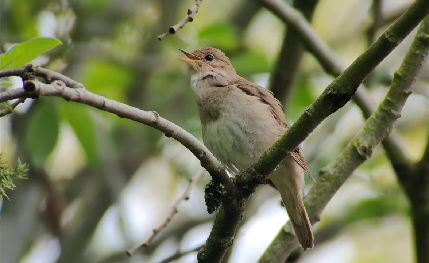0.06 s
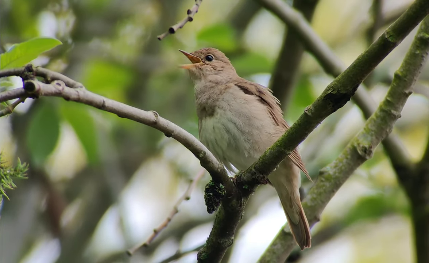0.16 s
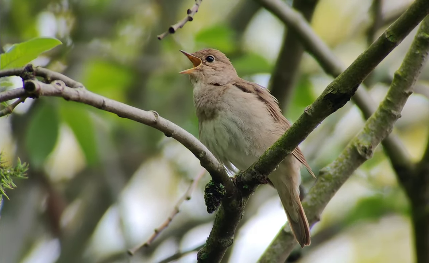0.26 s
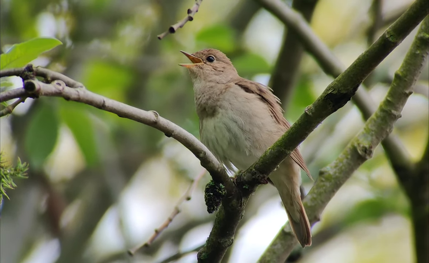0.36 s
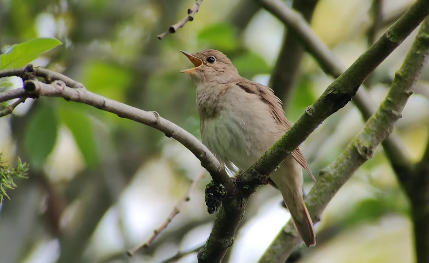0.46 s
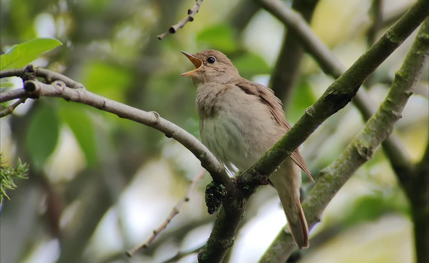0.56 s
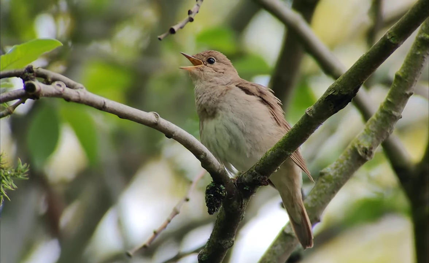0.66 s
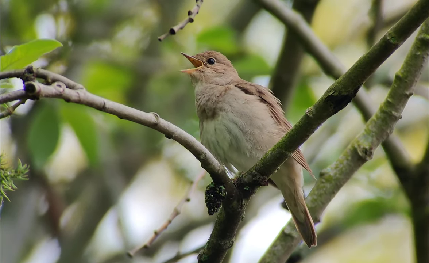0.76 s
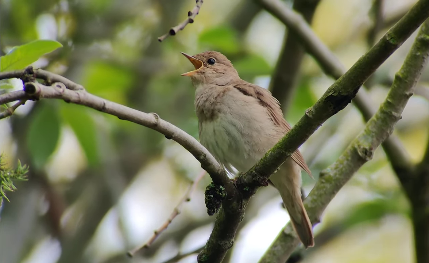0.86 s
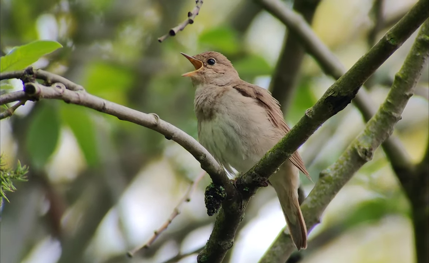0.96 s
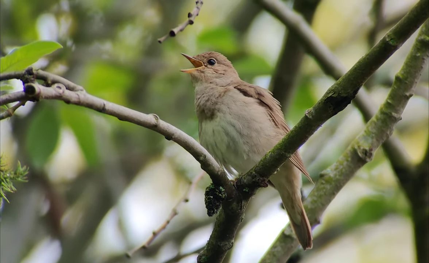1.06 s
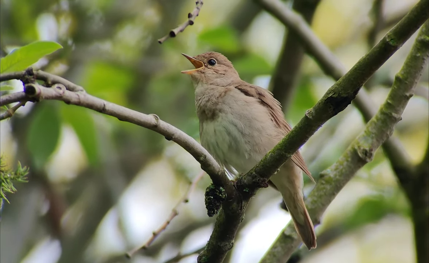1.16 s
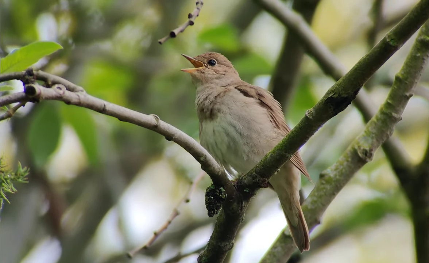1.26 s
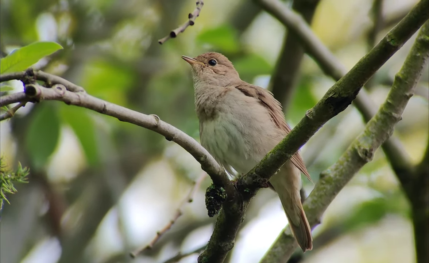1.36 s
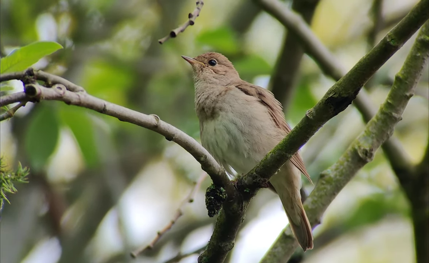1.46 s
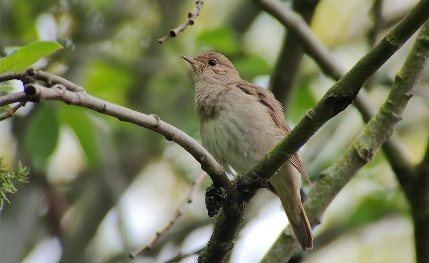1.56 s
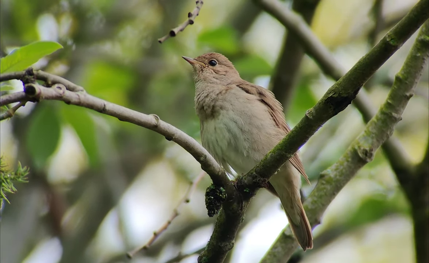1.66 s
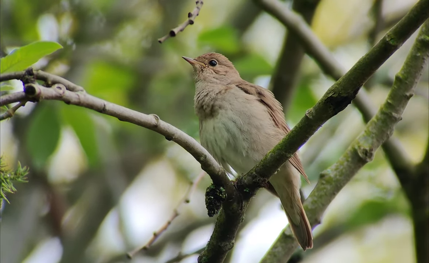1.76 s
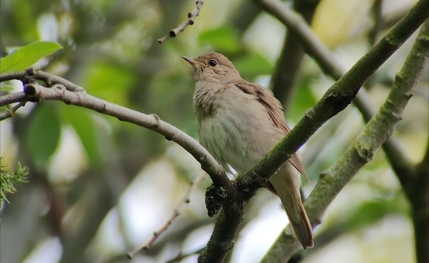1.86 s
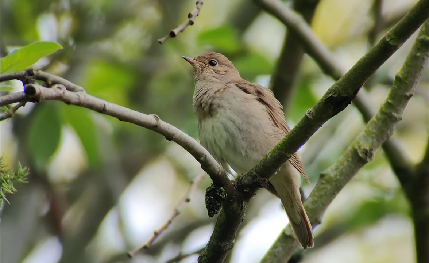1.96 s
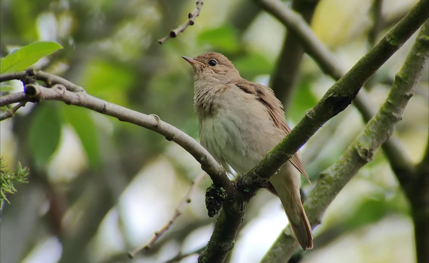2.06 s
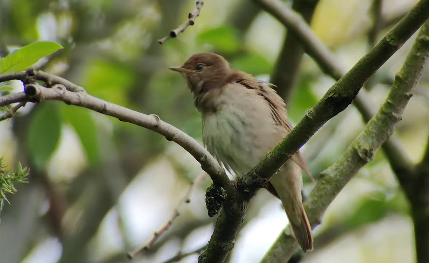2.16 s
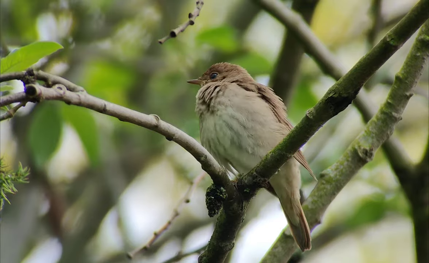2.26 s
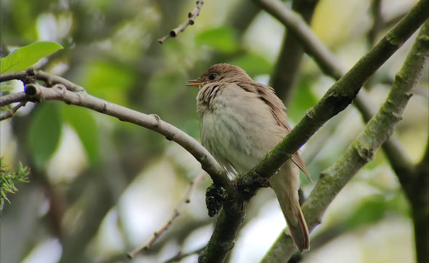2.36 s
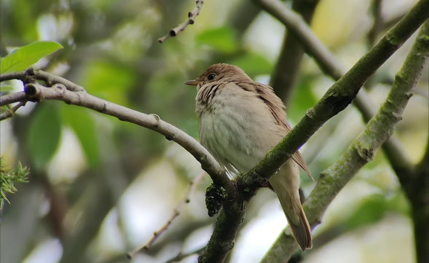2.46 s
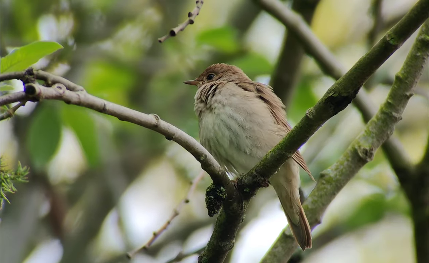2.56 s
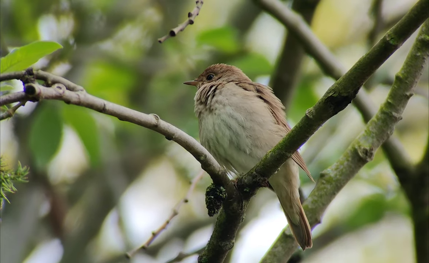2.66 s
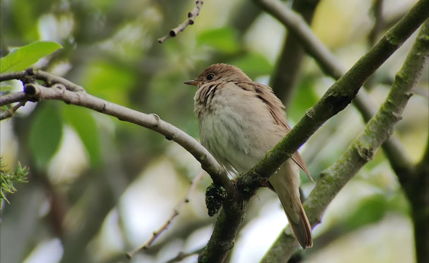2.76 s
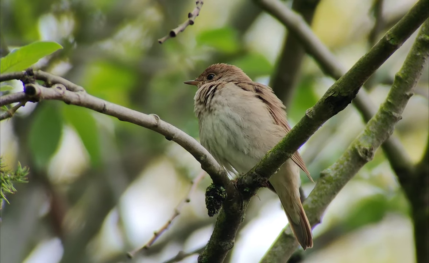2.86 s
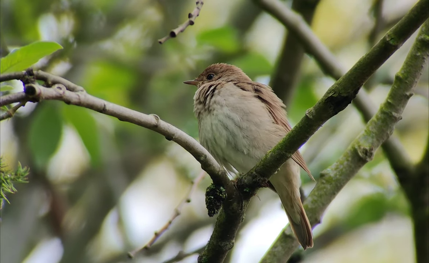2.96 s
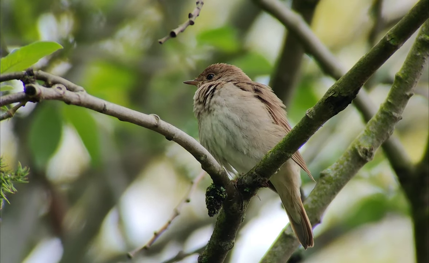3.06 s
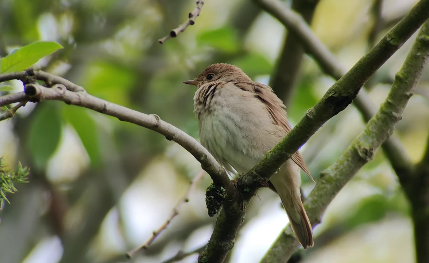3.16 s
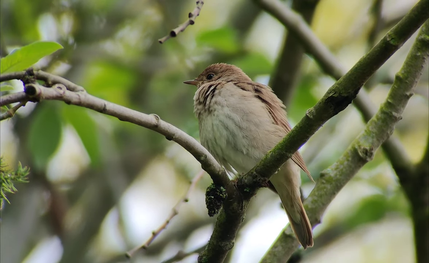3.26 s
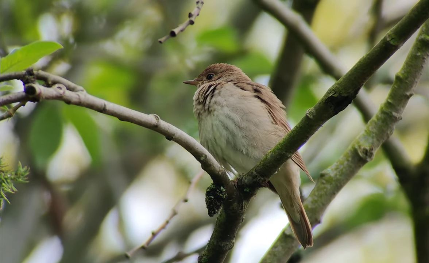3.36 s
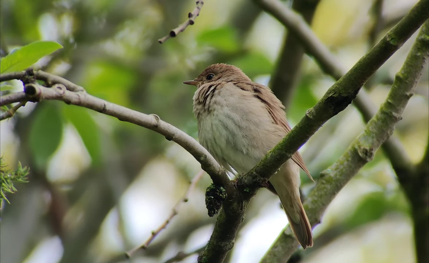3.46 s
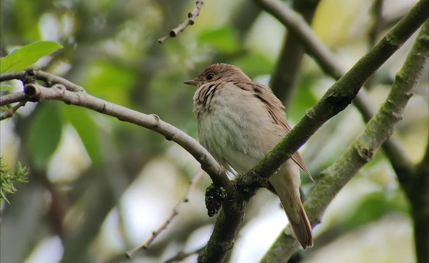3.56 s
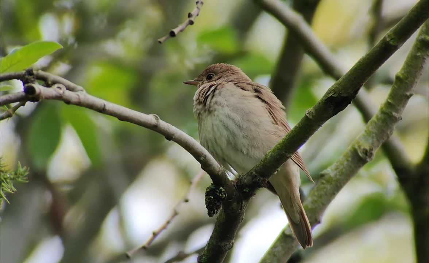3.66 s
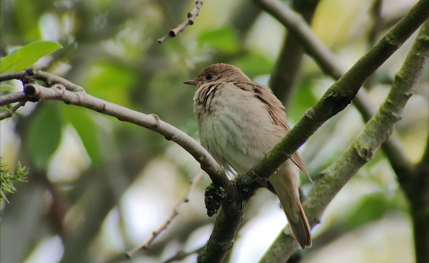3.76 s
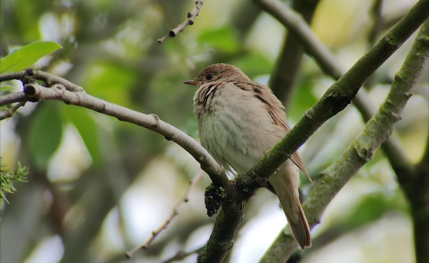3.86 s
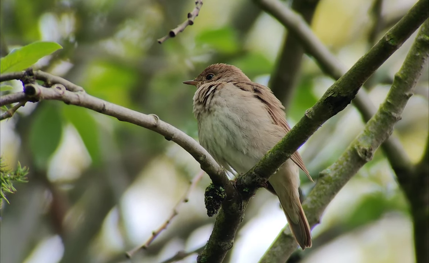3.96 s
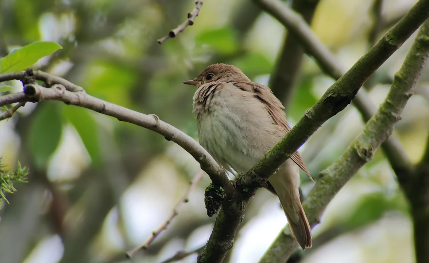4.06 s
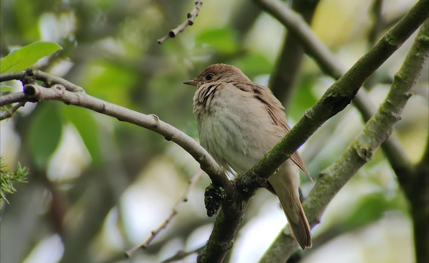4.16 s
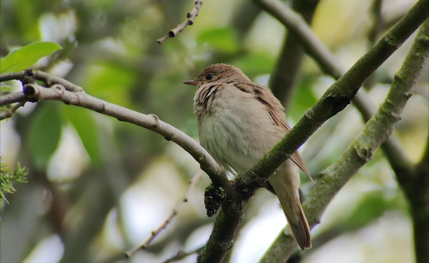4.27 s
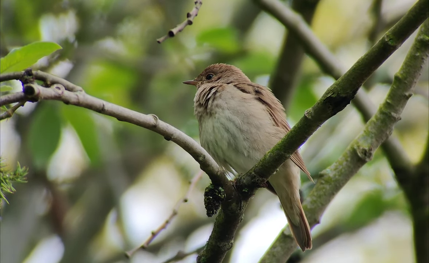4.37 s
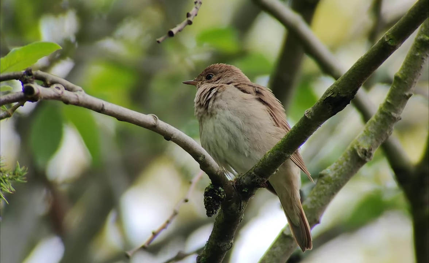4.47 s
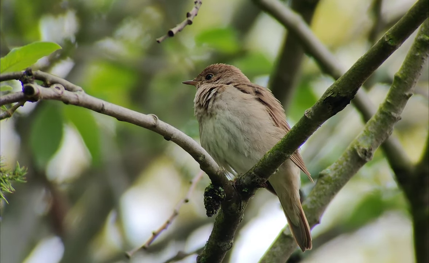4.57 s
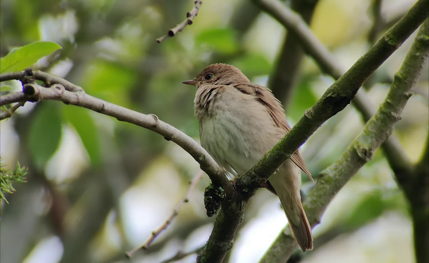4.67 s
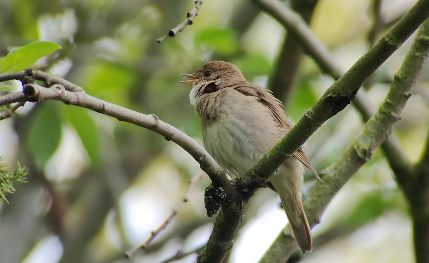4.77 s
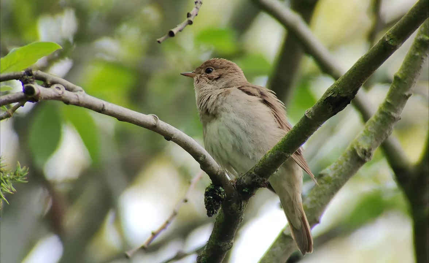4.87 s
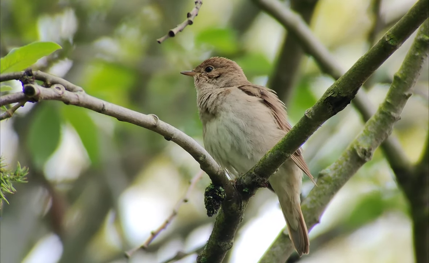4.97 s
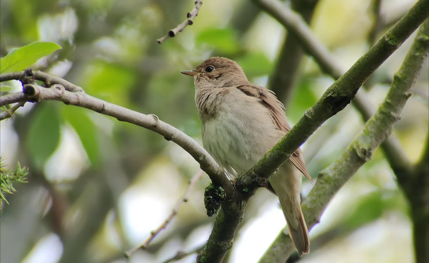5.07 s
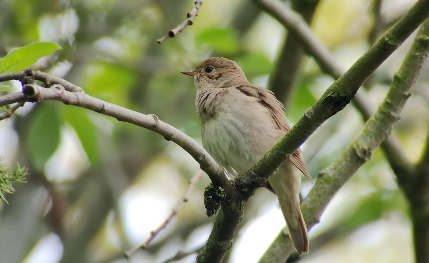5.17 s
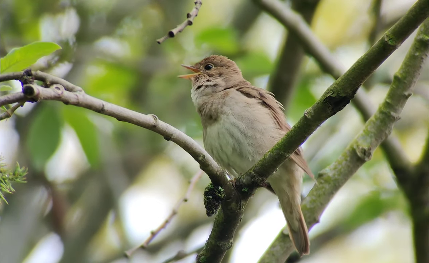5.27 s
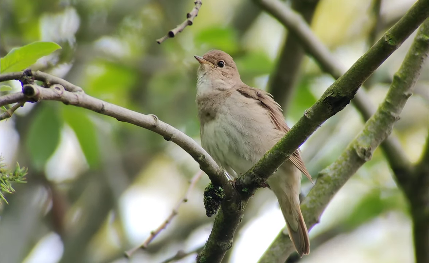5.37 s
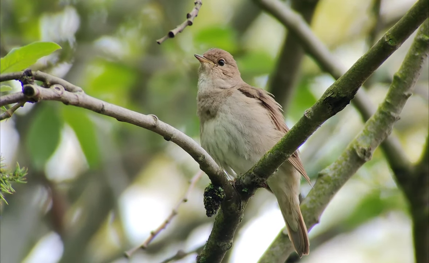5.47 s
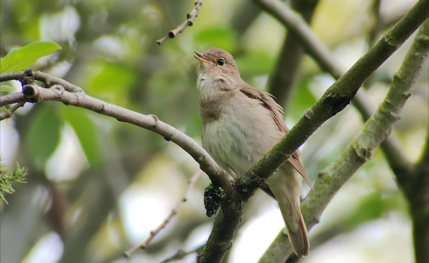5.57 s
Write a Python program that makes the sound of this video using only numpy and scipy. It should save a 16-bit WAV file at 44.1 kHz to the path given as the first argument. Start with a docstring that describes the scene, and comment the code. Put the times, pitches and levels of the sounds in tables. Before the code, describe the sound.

A thrush nightingale gives quick slurred whistles and a dry clicking rattle, then pauses, while distant gulls screech over low traffic rumble.

```python
"""A thrush nightingale sings from a branch in a leafy thicket: gliding tones make its slurred whistles and
a thin high flick, noise puffs a dry rattle of double clicks; after a pause come two soft opening notes.
Leaves and trunks scatter the song, made as fading noise echoes. Farther off, gulls screech in throbbing
harmonics and small birds pipe in plain tones, over filtered noise for traffic and distant machinery
and two low tones for an idling engine."""
import sys
import numpy as np
from scipy import signal
from scipy.fft import rfft, irfft
from scipy.io import wavfile
from scipy.ndimage import map_coordinates

SR = 44100
rng = np.random.default_rng(int(sys.argv[2]) if len(sys.argv) > 2 else 0)


def unload_wav(signal):
    """Save mono or channel-first audio to the path in sys.argv[1] as 16-bit WAV at rate SR, clipped to [-1, 1]."""
    wavfile.write(
        sys.argv[1],
        SR,
        np.round(np.clip(np.atleast_2d(signal).T, -1, 1) * 32767).astype(np.int16),
    )


N = 247842

# The nightingale's slurs. Each row: start in seconds, length in seconds, first, middle and last pitch in Hz,
# peak level in dB before left-right placing, place of the peak within the slur (0-1).
WHISTLES = [(0.177, 0.014, 2270, 1500, 1420, -35.5, 0.2), (0.188, 0.019, 1314, 1794, 2280, -28.5, 0.97),
            (0.2122, 0.0063, 2950, 2510, 2400, -19.5, 0.6), (0.22, .011, 2380, 1992, 1570, -28, 0.4),
            (0.316, .022, 4730, 4950, 5500, -37.5, 0.5), (0.317, 0.021, 3230, 4200, 4700, -33.5, 0.96),
            (.338, 0.032, 3190, 3600, 4540, -28.5, 0.98), (0.368, 0.02, 2750, 2970, 3380, -37, 1),
            (.384, .021, 3120, 3930, 4470, -22.5, 0.54), (.402, 0.012, 4350, 4520, 4720, -21.5, 0.54),
            (1.409, 0.0074, 9800, 9100, 8900, -48, 1), (1.414, 0.016, 8700, 8770, 8300, -40, 0.4),
            (1.426, 0.013, 8470, 7800, 7240, -41, 0.3), (4.897, 0.033, 2204, 2179, 2240, -35, 0.7),
            (4.936, 0.013, 2150, 1865, 1720, -39.5, 0.2), (4.942, 0.026, 2184, 2190, 2230, -44.5, 0.8),
            (5.413, 0.0054, 2460, 2320, 2390, -31.5, 0), (5.419, 0.024, 2220, 2210, 2250, -27, 0.27),
            (5.436, 0.048, 2190, 2229, 2130, -33.5, 0.3), (5.453, 0.008, 2100, 1807, 1620, -33.5, 0.6)]
# How the swell of a slur is shaped: power of a half sine (lower is fuller, with more abrupt ends).
SLUR_POWER = 0.65
# The rattle, an even run of double clicks. Each row: start in seconds, gap to the second click in seconds,
# relative level of the first click in dB, relative level of the second click in dB.
RATTLE = [(.469, .007, -34, -40), (.5276, 0.0066, -36, -31.5), (.588, 0.0077, -32.5, -31.5),
          (.6457, 0.0056, -30, -28.5), (.701, 0.0071, -28.5, -29), (0.76, .0075, -29, -32.5),
          (0.8187, 0.006, -30, -31.5), (0.8772, .0072, -34.5, -28.5), (.935, .0057, -31.5, -27),
          (.992, .006, -32, -29), (1.049, .0068, -32.5, -31), (1.1055, 0.0065, -32, -29),
          (1.164, .0063, -31.5, -33), (1.2201, 0.0078, -28.5, -30.5), (1.2775, 0.0085, -29.5, -28.5),
          (1.337, 0.0078, -28.5, -30)]
SNAP_S = 0.0005  # growth time of a click, in seconds
# Puffs of rasp under the rising slurs. Each row: start in seconds, level in dB before placing.
RASPS = [(0.311, -41.5), (0.361, -46)]
RASP_ATTACK_S, RASP_HOLD_S, RASP_FADE_DB_PER_S = 0.003, 0.019, 600
# Resonances of the throat and open beak. Each row: centre in Hz, width in Hz, relative level in dB.
BEAK = [(3430, 1740, 4.5), (3900, 850, 11), (5000, 1430, 3.5), (6950, 1200, -3.5)]
# How much louder the singer is on the left, in dB.
WHISTLE_LEFT_DB, CLICK_LEFT_DB, ECHO_LEFT_DB = 5.3, 3.5, 3
# Colour of the clicks as the foliage throws them back. Each row: frequency in Hz, relative level in dB.
FOLIAGE = [(1500, 16), (2500, 4), (3400, -0.5), (4600, 3), (5250, 12), (6000, 3), (7500, 5.5), (12000, 7)]

# Gull screeches. Each row: start in seconds, length in seconds, base pitch in Hz, glide as a share of the pitch,
# average throbs per second, level in dB before the whole cry is rounded off, brightness of the upper harmonics in dB.
GULLS = [(1.155, 0.19, 1025, 0.056, 62, -58.5, -12), (1.629, 0.23, 973, -0.065, 65, -60, 4.5),
         (2.248, 0.2, 992, 0.18, 130, -56.5, 0), (2.331, .19, 906, -0.046, 64, -54.5, 6),
         (2.587, 0.2, 897, -.03, 66, -45.5, 0.5), (2.87, .12, 1052, .03, 106, -51, -4),
         (3.184, .21, 928, 0.022, 54, -43.5, 5.5), (3.342, 0.15, 1066, .1, 67, -48.5, -2),
         (3.855, .265, 945, -.04, 64, -43.5, 3.5), (4.355, .185, 1057, .05, 83, -43, 4),
         (4.562, .29, 914, -.06, 58, -44.5, 9.5), (4.841, 0.24, 762.6, .04, 87, -51, 15.5),
         (4.981, 0.27, 969, -0.17, 64, -46, 11.5), (5.025, 0.49, 1230, -0.11, 73, -51.5, 4.5),
         (5.145, 0.39, 1034, 0.031, 69, -48.5, 11), (5.365, 0.25, 1004, -.15, 92, -41.5, 3.5)]
# Colour of a gull's throat. Each row: frequency in Hz, relative level in dB.
GULL_THROAT = [(700, 3.5), (1050, -17.5), (1500, 15.5), (1800, 8.5), (2200, -1), (2700, -5.5),
               (3300, -17.5), (4000, -10.5), (4750, -3), (5500, -17), (6500, -21), (7200, -19.5),
               (8500, -47)]
# Each throb swings this many dB up and down, and its pitch by this share either way.
THROB_DB, THROB_SWING = 8.5, 0.09
CRY_SAG = 0.115  # share of the base pitch by which a cry lies lower at both ends, before its glide
CRY_POWER = 0.7  # shape of a whole cry: power of a half sine
# Small birds far away. Each row: start in seconds, length in seconds, first and last pitch in Hz,
# relative peak level in dB.
PIPES = [(.01, 0.059, 2723, 2597, -42.5), (.099, 0.051, 2250, 1700, -44), (1.657, 0.068, 5960, 6500, -63),
         (1.92, .43, 8230, 8130, -78), (2.842, 0.031, 3890, 4930, -50.5), (3.519, .053, 2950, 2570, -52.5),
         (3.594, 0.048, 2820, 2604, -47.5), (3.694, 0.065, 3240, 2900, -54.5),
         (3.76, 0.065, 2700, 2510, -57), (5.032, .04, 4380, 4280, -42.5), (5.302, 0.028, 4380, 4324, -40.5),
         (5.532, 0.037, 4367, 4364, -39.5)]
# A far bird's low chuckle of even pips; its level is relative, like those of the other small birds.
CHUCKLE_START_S, CHUCKLE_PER_S, CHUCKLE_PIP_S, CHUCKLE_HZ, CHUCKLE_DB = 2.575, 29.5, 0.011, 1040, -47
# The first cluster of echoes from the far birds: dB over the tail, fading time in seconds.
FAR_EARLY_DB, FAR_EARLY_S = 12, 0.018

# Colour of traffic and air. Each row: frequency in Hz, relative level in dB per Hz.
AIR = [(20, -7), (32, -3), (45, -4), (72, -2), (105, -10), (175, -25), (260, -24), (390, -21), (600, -25),
       (1000, -28), (1900, -28), (3200, -38), (4700, -39), (8000, -49), (16000, -48)]
# How alike left and right are. Each row: frequency in Hz, likeness (0-1).
LIKENESS = [(30, .98), (100, .95), (200, .87), (400, .82), (600, .6), (900, .45), (1300, .5), (1900, .2),
            (4000, .1), (12000, 0)]
# Swell of the traffic. Each row: time in seconds, level in dB before AIR_DB is added.
TRAFFIC = [(0.1, -57.5), (2.16, -61.5), (5.5, -58)]
AIR_DB = 17
# Idling engine. Each row: time in seconds, level of the firing note in dB, level of its octave in dB,
# both before the trims below.
ENGINE = [(0.0, -40.5, -47), (0.8, -37, -42.5), (1.6, -40, -46.0), (2.4, -42, -51), (3.4, -41, -50.5),
          (4.2, -41, -40), (4.9, -35, -44.5), (5.6, -37.7, -40.5)]
FIRING_HZ = 44.5  # average pitch
FIRING_DB, OCTAVE_DB = -2.5, -2.5  # trims
WAVER_DB, WAVER_PER_S = 1, 13  # spread of the level in dB, new random values per second
# Steady hums of distant machinery. Each row: centre in Hz, width in Hz of each of two filter passes,
# level in dB before placing.
HUMS = [(144.5, 7, -65), (319.1, 9.1, -67.5), (417.2, 28, -64.5), (1322, 39, -61)]
CUTOFF_HZ = 15900


def from_db(db):
    """Turn decibels into a gain."""
    return 10 ** (np.asarray(db) / 20)


def rms_one(x):
    """Scale a sound to an average power of one."""
    return x / np.sqrt(np.mean(x ** 2) + 1e-20)


def at_hz(points, hz):
    """Read a spectrum between its points, on a log-frequency axis."""
    known, values = np.transpose(points)
    return np.interp(np.log(np.maximum(hz, 1)), np.log(known), values)


def in_time(rows):
    """Spread the columns of a time curve over every sample."""
    s, *columns = np.transpose(rows)
    return [np.interp(np.arange(N) / SR, s, c) for c in columns]


def drift(rate, size):
    """A random wander: straight lines between random values, rate of them per second."""
    knots = rng.standard_normal(4096)
    return np.interp(np.arange(size) * rate / SR, np.arange(len(knots)), knots)


def add(out, start_s, sound):
    """Mix a sound in at its time."""
    i = max(round(start_s * SR), 0)
    out[i:i + len(sound)] += sound[:max(N - i, 0)]


def resonate(x, hz, width_hz):
    """One resonance, rings at its own pitch, with a gain of about one at the top."""
    r = np.exp(-np.pi * width_hz / SR)
    edge = (1 - r * r) / 2
    ring = [1, -2 * r * np.cos(2 * np.pi * hz / SR), r * r]
    return signal.lfilter([edge, 0, -edge], ring, x + 1e-18)


def turn(hz):
    """Running phase of a gliding pitch."""
    return 2 * np.pi * np.cumsum(hz) / SR


def arc(first, middle, last, u):
    """A smooth bend through three pitches as u runs from 0 to 1."""
    return np.polyval(np.polyfit([0, .5, 1], [first, middle, last], 2), u)


def whistles(overtone_db, waver):
    """Each slur is a nearly pure tone that bends and swells once; the beak lets a trace of its octave through."""
    tone, octave = np.zeros(N), np.zeros(N)
    for s, length, first, middle, last, db, peak in WHISTLES:
        u = np.linspace(0, 1, round(length * SR))
        hz = arc(first, middle, last, u) * (1 + waver * drift(1070, len(u)))
        phase = turn(hz)
        # a half sine, skewed so that its top falls at the peak
        peak_at = np.clip(peak, .05, .95)
        swell = np.sin(np.interp(u, [0, peak_at, 1], [0, np.pi / 2, np.pi]))
        gain = from_db(db) * np.abs(swell) ** SLUR_POWER
        add(tone, s, gain * np.sin(phase))
        add(octave, s, gain * np.sin(2 * phase))
    return tone + from_db(overtone_db) * beak(octave, leak_db=-27)


def rattle(first_s, second_s, rise_s, level_db):
    """The two sides of the syrinx (voice organ) snap one after the other, each a quickly fading noise puff."""
    out, t = np.zeros(N), np.arange(600) / SR
    for s, gap, first_db, second_db in RATTLE:
        for start, db, decay in ((s, first_db, first_s), (s + gap, second_db, second_s)):
            noise = rng.choice([-1., 1.], len(t))
            puff = noise * (1 - np.exp(-t / rise_s)) * np.exp(-t / decay)
            click = beak(puff, leak_db=-21)
            # even out the energy, so that the table sets how strong each click is
            click = click / np.sqrt(np.sum(click ** 2) / (decay * SR))
            add(out, start, from_db(db + level_db) * click)
    return out


def rasp():
    """Turbulent air through the beak: short puffs of noise that start fast, hold and fade."""
    gain, t = np.zeros(N), np.arange(SR) / SR
    fading_s = np.maximum(t - RASP_ATTACK_S - RASP_HOLD_S, 0)
    puff = np.minimum(t / RASP_ATTACK_S, 1) * from_db(-RASP_FADE_DB_PER_S * fading_s)
    for s, db in RASPS:
        add(gain, s, from_db(db) * puff)
    return gain * rms_one(beak(rng.standard_normal(N), leak_db=-14.5))


def beak(x, leak_db):
    """Broad resonances of throat and beak colour a sound; a little treble passes them by."""
    body = np.zeros(len(x))
    for k, (hz, width, db) in enumerate(BEAK):
        # neighbouring resonances take opposite signs
        body = body + (-1) ** k * from_db(db) * resonate(x, hz, width)
    band = signal.butter(4, [2600, 7600], "band", fs=SR, output="sos")
    treble = signal.butter(2, 3000, "high", fs=SR, output="sos")
    return signal.sosfilt(band, body) + from_db(leak_db) * signal.sosfilt(treble, x)


def thicket(x, colour, t60, early_db, early_s, wet_db):
    """Countless small echoes off leaves and trunks: an early cluster, then a tail that falls 60 dB in t60 s."""
    t = np.arange(SR) / SR
    tail = from_db(-60 * t / t60)
    cluster = from_db(early_db) * np.exp(-t / early_s)
    # silent for 1.3 ms, then full after another 2.6 ms
    decay = (tail + cluster) * np.clip(t / 0.0026 - .5, 0, 1)
    echoes = rng.standard_normal((2, len(t))) * decay / np.sqrt(np.sum(decay ** 2))
    tint = from_db(at_hz(colour, np.fft.rfftfreq(len(t), 1 / SR)))
    echoes = irfft(rfft(echoes) * tint, len(t))
    return from_db(wet_db) * signal.fftconvolve(x[None], echoes, axes=1)[:, :N]


def place(x, left_db, lag_s):
    """Place a direct sound: left_db louder on the left, and reaching the left lag_s later."""
    late = map_coordinates(x, [np.arange(N) - lag_s * SR], order=3)
    return np.array([late * from_db(left_db / 2), x * from_db(-left_db / 2)])


def gulls(jitter, uneven, lead):
    """Harmonic cries on an arched pitch, chopped into throbs; the pitch swings up and down with each throb."""
    out = np.zeros(N)
    for s, length, pitch, glide, rate, db, bright_db in GULLS:
        size = round(length * SR)
        u = np.linspace(0, 1, size)
        arch = pitch * arc(1 - CRY_SAG - glide / 2, 0.97, 1 - CRY_SAG + glide / 2, u)
        beat = turn(rate * (1 + uneven * drift(33.5, size)))
        swing = THROB_SWING * (np.sin(beat - lead) - .5)
        hz = arch * (1 + swing + jitter * drift(1200, size))
        phase = turn(hz)
        cry = np.zeros(size)
        for k in range(1, 10):
            # brightness counts half for the third harmonic, fully from the fourth up
            harmonic_db = at_hz(GULL_THROAT, k * hz) + bright_db * np.clip((k - 2) / 2, 0, 1)
            cry = cry + from_db(harmonic_db) * np.sin(k * phase)
        # the throbs vary in strength
        throb_db = THROB_DB * np.sin(beat) + 2 * drift(rate, size)
        cry = rms_one(cry * from_db(throb_db))
        add(out, s, from_db(db) * cry * np.abs(np.sin(np.pi * u)) ** CRY_POWER)
    return out


def small_birds(waver):
    """Short, plain slurs, and five pips in a row: single gliding tones that swell and fade."""
    out = np.zeros(N)
    chuckle = []
    for k in range(5):
        start = CHUCKLE_START_S + k / CHUCKLE_PER_S
        chuckle.append((start, CHUCKLE_PIP_S, CHUCKLE_HZ, CHUCKLE_HZ, CHUCKLE_DB))
    for s, length, first, last, db in list(PIPES) + chuckle:
        u = np.linspace(0, 1, round(length * SR))
        hz = (first + (last - first) * u) * (1 + waver * drift(122, len(u)))
        add(out, s, from_db(db) * np.sin(np.pi * u) * np.sin(turn(hz)))
    return out


def traffic(lag_s):
    """A smooth far roar of shaped noise, later on the left, most alike in both ears in the bass."""
    hz = np.fft.rfftfreq(N, 1 / SR)
    colour = from_db(at_hz(AIR, hz)) * hz / np.hypot(hz, 15)  # thinned out below about 15 Hz
    mid, side = rfft(rng.standard_normal((2, N))) * colour
    alike = np.clip(at_hz(LIKENESS, hz), -1, 1)
    ears = np.sqrt(1 + alike) * mid + np.sqrt(1 - alike) * side * [[1], [-1]]
    # the deepest rumble comes from all round: its lag shrinks towards nothing
    lag = lag_s * hz / np.hypot(hz, 380)
    ears[0] *= np.exp(-2j * np.pi * hz * lag)
    swell_db, = in_time(TRAFFIC)
    return from_db(swell_db + AIR_DB) * rms_one(irfft(ears, N))


def engine(wander):
    """The firing note of an idling engine and its octave, each wavering by itself on the air."""
    first_db, second_db = in_time(ENGINE)
    phase = turn(FIRING_HZ * (1 + wander * drift(5.92, N)))
    out = np.zeros(N)
    for k, db in enumerate((first_db + FIRING_DB, second_db + OCTAVE_DB), 1):
        out = out + from_db(db + WAVER_DB * drift(WAVER_PER_S, N)) * np.sin(k * phase)
    return out


def hums():
    """Narrow, unsteady tones of far machinery: noise passed twice through a resonance."""
    out = np.zeros(N)
    for hz, width, db in HUMS:
        once = resonate(rng.standard_normal(N), hz, width)
        out = out + from_db(db) * rms_one(resonate(once, hz, width))
    return out


def scene():
    """The near singer, the far birds and the rumble behind them."""
    tones = whistles(overtone_db=-31.5, waver=0.0031) + rasp()
    clicks = rattle(first_s=0.0012, second_s=0.0012, rise_s=SNAP_S, level_db=-3)
    near = place(tones, left_db=WHISTLE_LEFT_DB, lag_s=0.00002)
    near = near + place(clicks, left_db=CLICK_LEFT_DB, lag_s=0.00003)

    # echo colours written here are pairs of Hz and dB
    tone_colour = [(1500, 8.5), (2500, 2.4), (4400, 3.8), (8800, 9.8)]
    leaves = thicket(tones, tone_colour, t60=0.52, early_db=-5, early_s=0.029, wet_db=-6.5)
    leaves = leaves + thicket(clicks, FOLIAGE, t60=0.44, early_db=-0.5, early_s=0.0057, wet_db=-3.0)
    leaves = leaves * from_db(ECHO_LEFT_DB * np.array([[.5], [-.5]]))

    # the far birds are heard both directly and through echoes off the trees
    cries = gulls(jitter=0.0143, uneven=0.0807, lead=0.66)
    pipes = small_birds(waver=0.007)
    far = place(cries + from_db(-4.5) * pipes, left_db=0.0, lag_s=0.00006)
    far_colour = [(1000, -1), (1800, -3), (4500, 1), (8000, -1)]
    far = far + thicket(cries + pipes, far_colour, t60=0.75, early_db=FAR_EARLY_DB,
                        early_s=FAR_EARLY_S, wet_db=-0.5)

    rumble = traffic(lag_s=0.000513) + place(hums(), left_db=0.0, lag_s=0.00049)
    rumble = rumble + engine(wander=0.0192)
    # the rumble is raised by half a dB on the left and lowered by half a dB on the right
    return near + leaves + far + rumble * from_db([[.5], [-.5]])


def record(dry):
    """The top of the band is cut steeply."""
    steep = signal.ellip(10, .1, 70, CUTOFF_HZ, fs=SR, output="sos")
    return signal.sosfilt(steep, dry)


dry = scene()
out = record(dry)
unload_wav(out)
```